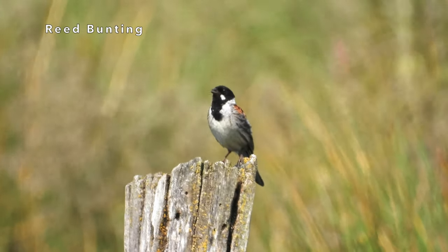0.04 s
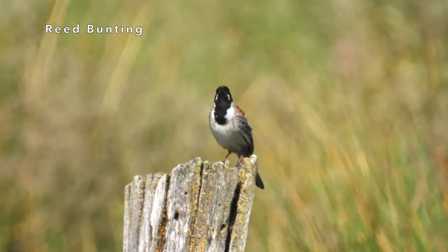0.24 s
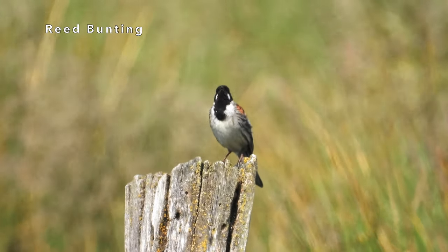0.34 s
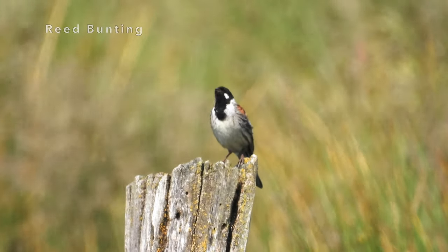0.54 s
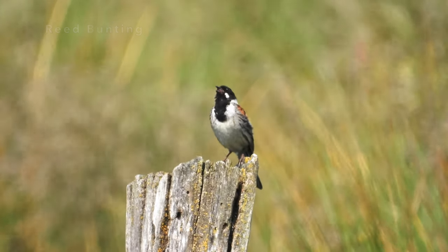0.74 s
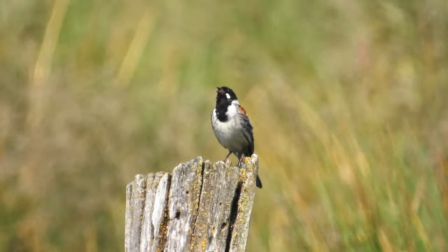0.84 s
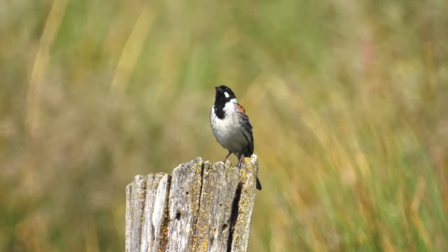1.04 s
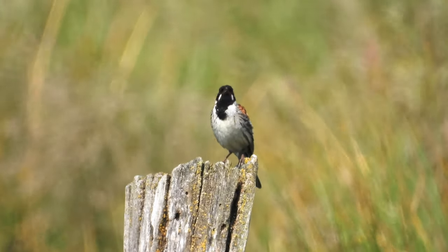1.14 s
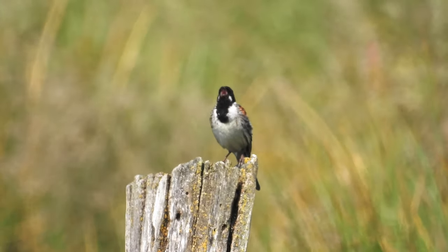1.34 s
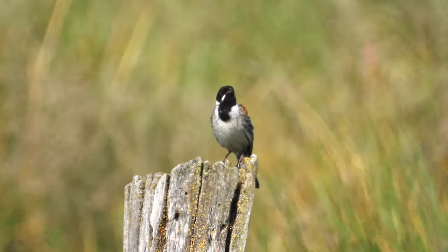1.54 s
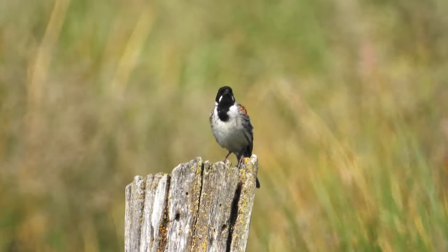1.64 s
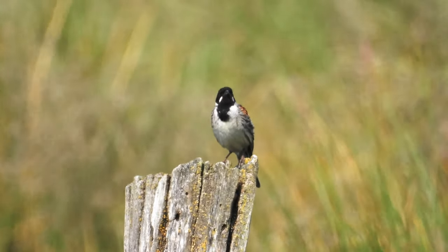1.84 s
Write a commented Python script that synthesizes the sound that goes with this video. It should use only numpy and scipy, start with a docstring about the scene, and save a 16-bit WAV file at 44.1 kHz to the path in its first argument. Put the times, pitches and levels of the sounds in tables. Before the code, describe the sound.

A small bird sings in an open meadow. The tail of an earlier note fades at 0 s while soft low wind bumps thud until 0.4 s. A rapid slurred, gliding phrase comes at 0.36-0.53 s, then stuttering, falling chirps at 0.92 and 1.02 s, and again at 1.46 and 1.56 s. A faint tick at 1.12 s, faint far call near 1.65 s, slight breeze. Right channel; left only hiss.

```python
"""Small bird on a fence post

A small bird sings a slurred opening phrase and two pairs of quick chirps, as gliding sine whistles.
The meadow grass scatters each note, as decaying noise convolved with the song.
Light wind bumps the microphone with low pushes and puffs of noise; ticks, pips and crackle are faint.
One call, perhaps a bird, comes from far off, as a low gliding whistle and its faint octave.
The microphone feeds the right channel; the left carries only faint hiss.
"""
import sys
import numpy as np
from scipy import signal
from scipy.io import wavfile
from scipy.ndimage import uniform_filter1d

SR = 44100
rng = np.random.default_rng(int(sys.argv[2]) if len(sys.argv) > 2 else 0)


def to_wav(sig):
    """Store sig (one row per channel, or 1-D mono) as 16-bit WAV at the path in sys.argv[1].

    Samples outside -1..1 are clipped; the rate is SR.
    """
    pcm = np.clip(np.atleast_2d(sig), -1, 1) * 32767
    pcm = np.round(pcm).astype(np.int16)
    wavfile.write(sys.argv[1], SR, pcm.T)  # frames by channels


N = 83790  # length in samples
TIME = np.arange(N) / SR  # seconds


def amp(db):
    """Decibels to gain."""
    return 10 ** (np.asarray(db) / 20)


def unit(x):
    """Scales to rms 1."""
    return x / np.sqrt(np.mean(x ** 2) + 1e-20)


def smooth(x, seconds):
    """Moving average under a bell that falls to exp(-2) at the given seconds from its centre."""
    lag = np.arange(-200, 201) / SR
    bell = np.exp(-2 * (lag / seconds) ** 2)
    padded = np.pad(x, len(lag) // 2, "edge")
    return np.convolve(padded, bell / bell.sum(), "valid")


def add(mix, start_s, sound):
    """Mixes a sound in at a time, cut off at the end of the scene."""
    part = mix[max(round(start_s * SR), 0):][:len(sound)]
    part += sound[:len(part)]


def swell(rise_s):
    """A short envelope that rises to 1 and dies away."""
    u = TIME / rise_s
    return u * np.exp(1 - u)


def level_curve(points):
    """Gain over the whole scene, drawn in straight dB lines between (s, dB) points."""
    return amp(np.interp(TIME, *np.transpose(points)))


def noise(colour, patchy_db=0):
    """Noise of rms 1, coloured by (Hz, dB) points, with random patches in time and pitch."""
    hz = np.fft.rfftfreq(1024, 1 / SR)
    real, imag, patches = rng.standard_normal((3, N // 256 + 5, len(hz)))
    patches = uniform_filter1d(patches, size=6, axis=0)  # blurred in time
    patches = unit(uniform_filter1d(patches, size=12, axis=1))  # blurred in frequency
    colour_hz, colour_db = np.transpose(colour)
    spectrum_db = np.interp(np.log(hz + 1), np.log(colour_hz), colour_db)
    frames = (real + 1j * imag) * amp(spectrum_db + patchy_db * patches)
    return unit(signal.istft(frames.T, nperseg=1024, noverlap=768)[1][:N])


def scatter(x, db, rise_s, t60_s):
    """A cloud of small reflections that builds up and dies away by 60 dB in t60_s."""
    t = TIME[:SR // 2]
    tail = rng.standard_normal(len(t)) * amp(-60 * t / t60_s) * np.minimum(t / rise_s, 1)
    return amp(db) * signal.fftconvolve(x, tail / np.linalg.norm(tail))[:N]


EDGE_S, GLIDE_S = .0018, .0011  # soft ends of a note; rounding of its contour
JITTER, JITTER_S = .007, .0005  # rms share of the pitch; smoothing of the waver
RASP, RASP_HZ_PER_S, RASP_S = .18, 250000, .0004  # roughness; glide speed scale; smoothing
OVERTONE_DB = -46  # octave, relative to the whistle


def tone(hz, db):
    """A nearly pure, slightly unsteady whistle with soft ends, rougher where it glides fast."""
    t = np.arange(len(hz)) / SR
    wobble, grain = rng.standard_normal((2, N // 8))
    waver = 1 + JITTER * np.resize(unit(smooth(wobble, JITTER_S)), len(hz))
    glide_hz_per_s = abs(np.gradient(hz)) * SR
    roughness = np.resize(unit(smooth(grain, RASP_S)), len(hz))
    rasp = RASP * np.tanh(glide_hz_per_s / RASP_HZ_PER_S) * roughness
    phase = 2 * np.pi * np.cumsum(hz * waver) / SR
    whistle = np.sin(phase) + amp(OVERTONE_DB) * np.sin(2 * phase)
    nearest_end_s = np.minimum(t, t[::-1])
    ends = np.sin(np.pi / 2 * np.minimum(nearest_end_s / EDGE_S, 1)) ** 2
    return ends * amp(db) * (1 + rasp) * whistle


def note(contour, pitch=1):
    """Start time and sound of a whistle that glides along a contour, its pitches multiplied by pitch."""
    s, hz, db = np.transpose(sorted(contour))
    t = np.arange(s[0], s[-1] + EDGE_S / 2, 1 / SR)
    hz_curve = smooth(np.interp(t, s, hz), GLIDE_S)
    db_curve = smooth(np.interp(t, s, db), GLIDE_S)
    return s[0], tone(pitch * hz_curve, db_curve)


# End of an earlier note from the post. Each row: time in seconds, pitch in Hz, level in dB.
EARLIER_NOTE = [(0, 4280, -32), (.003, 4050, -39), (.007, 3600, -52)]


def earlier_note(song):
    """The bird's earlier note, ending in a quick downward glide."""
    add(song, *note(EARLIER_NOTE))


# Colour of that note's echo. Each row: frequency in Hz, relative level in dB.
EARLIER_ECHO_COLOUR = [(2700, -43), (3600, 5), (4200, 5.5), (5500, -54)]


def earlier_echo():
    """The echo of the earlier note: a narrow band of noise that dies by 60 dB in 0.24 s."""
    start_db, t60_s = -52, .24
    return amp(start_db - 60 * TIME / t60_s) * noise(EARLIER_ECHO_COLOUR)


# Colour of the noise under the song. Each row: frequency in Hz, relative level in dB.
SONG_NOISE_COLOUR = [(1500, -18.5), (2500, 2), (3400, -27.5), (4500, 8.5), (7800, -3), (9000, -18.5),
                     (11000, -4.5), (13000, -30), (16000, -29)]


def song_noise(song):
    """Patchy coloured noise that swells and fades with the whistles."""
    loudness = smooth(abs(song), GLIDE_S)
    return amp(-23.5) * loudness * noise(SONG_NOISE_COLOUR, patchy_db=5)


# Colour of the low rumble. Each row: frequency in Hz, relative level in dB.
RUMBLE_COLOUR = [(20, -1), (45, -36), (80, -15.5), (140, 3), (200, 1.5), (320, -2.5), (500, -11.5),
                 (900, -30), (2000, -97), (16000, -80)]
# Level of the low rumble. Each row: time in seconds, level in dB.
RUMBLE_LEVEL = [(0, -56), (.07, -56), (.2, -53), (.38, -52), (.5, -59.5), (.68, -62.5), (.76, -58),
                (.9, -64), (.95, -77.5), (1.01, -65.5), (1.08, -79), (1.19, -66.5), (1.26, -56),
                (1.44, -63.5), (1.56, -55), (1.66, -66.5), (1.79, -64.5), (1.84, -52), (1.9, -56.5)]


def low_rumble():
    """Low coloured noise under a drawn level curve."""
    return noise(RUMBLE_COLOUR, patchy_db=2.5) * level_curve(RUMBLE_LEVEL)


# Breeze in the meadow grass. Each row: frequency in Hz, relative level in dB.
BREEZE_COLOUR = [(200, -10.5), (500, -9.5), (850, -2), (1200, -11.5), (1600, -18), (2300, -15.5),
                 (3300, -21.5), (6000, -20), (16000, -53)]
# Level of the breeze. Each row: time in seconds, level in dB.
BREEZE_LEVEL = [(0, -75), (.6, -76.5), (.95, -70), (1.18, -66), (1.3, -65), (1.5, -63), (1.64, -60.5),
                (1.71, -55), (1.78, -65.5), (1.9, -59.5)]


def breeze():
    """Broad coloured noise of the breeze in the grass, under a drawn level curve."""
    return noise(BREEZE_COLOUR, patchy_db=3.5) * level_curve(BREEZE_LEVEL)


# Steady outdoor air at the microphone. Each row: frequency in Hz, relative level in dB.
AIR_COLOUR = [(100, -22), (700, -1.5), (1400, 2.5), (2200, 5), (3300, -7.5), (5500, -2.5), (6500, -7),
              (7300, 5.5), (7900, 7), (8800, -4.5), (10500, -4.5), (13000, -9), (16000, -5)]


def outdoor_air():
    """Patchy coloured noise at one overall level."""
    return amp(-69) * noise(AIR_COLOUR, patchy_db=3.5)


# Hiss of the empty left channel. Each row: frequency in Hz, relative level in dB.
HISS_COLOUR = [(30, -12), (600, -13.5), (1300, -18), (2000, -4), (2700, -3), (4700, 1), (8000, 0),
               (16000, -0.5)]


def channel_hiss():
    """Faint noise of the channel that no microphone feeds."""
    return amp(-79) * noise(HISS_COLOUR, patchy_db=2.5)


# Dry stalks in the breeze. Each entry: pitch of one kind of snap in Hz.
CRACKLE_HZ = [5280, 7840, 8400]
CRACKLE_PER_S, CRACKLE_RISE_S = 11, .002  # snaps of all pitches together; rise of each
CRACKLE_DB, CRACKLE_SPREAD_DB = -61, .5  # smallest snap; scale of the random extra level


def crackle():
    """Sparse, tiny snaps of dry stalks: brief sine pulses at random times, of slightly uneven size."""
    u = TIME[:SR // 50] / CRACKLE_RISE_S
    envelope = u * np.exp(1 - u)
    chance = CRACKLE_PER_S / len(CRACKLE_HZ) / SR  # per sample and pitch
    out = np.zeros(N)
    for hz in CRACKLE_HZ:
        extra_db = CRACKLE_SPREAD_DB * np.minimum(rng.exponential(1, N), 2)
        snaps = amp(CRACKLE_DB + extra_db) * (rng.random(N) < chance)
        snap = envelope * np.sin(2 * np.pi * hz * TIME[:len(u)])
        out += signal.fftconvolve(snaps, snap)[:N]
    return out


# Faint ticks. Each row: start in seconds, level in dB.
TICKS = [(0.074, -62.5), (0.611, -65.5), (1.123, -50), (1.717, -61.5)]
# Colour of a tick's body and tail. Each row: frequency in Hz, relative level in dB.
TICK_COLOUR = [(300, -12), (1100, -18), (1400, -7), (1900, 1), (2250, 5), (2800, -4), (4500, -17),
               (9000, -24), (16000, -65)]
# Colour of its sharp crack. Each row: frequency in Hz, relative level in dB.
CRACK_COLOUR = [(500, -13), (2200, -3.5), (3000, -18.5), (4300, -5.5), (6000, -14), (16000, -50)]
TICK_RISE_S, TICK_T60_S = .004, .081
TICK_TAIL_DB, TICK_TAIL_T60_S = -9, .21  # tail level relative to the body
CRACK_DELAY_S, CRACK_DB, CRACK_RISE_S = .003, -1, .0012  # each crack's level relative to the tick


def ticks():
    """Dry ticks: a sharp crack in noise over a duller noise that decays first fast, then slower."""
    body = amp(-60 * TIME / TICK_T60_S)
    tail = amp(TICK_TAIL_DB - 60 * TIME / TICK_TAIL_T60_S)
    shape = np.minimum(TIME / TICK_RISE_S, 1) * (body + tail)
    out = np.zeros(N)
    for start_s, db in TICKS:
        add(out, start_s, amp(db) * shape * noise(TICK_COLOUR))
        for _ in range(2):  # two independent noises make up the crack
            crack = swell(CRACK_RISE_S) * noise(CRACK_COLOUR)
            add(out, start_s + CRACK_DELAY_S, amp(db + CRACK_DB) * crack)
    return out


# Wind bumps on the microphone. Each row: start in seconds, level in dB, pitch in Hz, rise in seconds.
BUMPS = [(.088, -38.5, 240, .003), (.112, -43, 190, .004), (.139, -45, 300, .0024),
         (.1585, -33, 290, .0024), (.169, -42, 350, .0028), (.2295, -37, 300, .0026),
         (.263, -48, 300, .004), (.3155, -37.5, 205, .004), (.355, -45, 155, .007),
         (.860, -45.5, 270, .0026), (1.696, -51, 150, .004)]
# Colour of a bump's puff. Each row: frequency as share of twice the bump's pitch, relative level in dB.
PUFF_COLOUR = [(.1, -27), (.4, 3), (1, 2.5), (1.5, -17), (2.6, -60)]
PUFF_DB = -9  # rms, relative to a push of amplitude 1


def wind_bumps():
    """Short low pushes at the microphone: a swelling sine with a puff of noise."""
    out = np.zeros(N)
    for start_s, db, hz, rise_s in BUMPS:
        puff = noise([(share * 2 * hz, level) for share, level in PUFF_COLOUR])
        push = np.sin(2 * np.pi * hz * TIME) + amp(PUFF_DB) * puff
        add(out, start_s, amp(db) * swell(rise_s) * push)
    return out


# Opening phrase from the post, a list of contours.
# Each row of a contour: time in seconds, pitch in Hz, level in dB.
PHRASE = [
    [(.361, 4800, -58), (.368, 5450, -42), (.373, 6150, -41), (.377, 6800, -48)],
    [(.3755, 4400, -41), (.380, 5330, -32), (.387, 5780, -33), (.3925, 6850, -40), (.398, 6200, -50)],
    [(.3915, 4250, -44), (.399, 5300, -30), (.409, 5610, -30), (.421, 5510, -28.5), (.433, 5260, -26.5),
     (.450, 4620, -32), (.457, 3950, -43)],
    [(.424, 4750, -52), (.436, 4450, -45), (.445, 4150, -42), (.449, 3900, -50)],
    [(.455, 7400, -50), (.4585, 7000, -42), (.463, 5350, -29.5), (.466, 4450, -33), (.469, 3800, -42),
     (.473, 4100, -42), (.479, 3200, -51)],
    [(.470, 4300, -48), (.474, 5500, -42), (.478, 4000, -44)],
    [(.480, 3100, -55), (.487, 3450, -40), (.5005, 3680, -39.5), (.5055, 2850, -46)],
]


def opening_phrase(song):
    """Slurred gliding notes, and a faint lower echo of the long one."""
    for contour in PHRASE:
        add(song, *note(contour))


# Tiny high pips from the meadow. Each row: start in seconds, opening level in dB.
PIPS = [(.449, -53), (0.77, -52.5), (1.545, -48.5), (1.621, -53), (1.668, -52)]
PIP_HZ, PIP_S, PIP_FALL_DB = 7970, .0043, -10


def pips():
    """Tiny high pips from the meadow: brief level whistles that fade, with scattered reflections."""
    out = np.zeros(N)
    for start_s, db in PIPS:
        add(out, start_s, note([(0, PIP_HZ, db), (PIP_S, PIP_HZ, db + PIP_FALL_DB)])[1])
    return out + scatter(out, db=-17, rise_s=.0065, t60_s=.2)


VIBRATO_PER_S, VIBRATO_HZ = 148, 520  # rate; depth each way
QUAVER_SAG_HZ, QUAVER_FADE_DB, QUAVER_THROB_DB = 520, -16, 3  # over its length; throb each way


def quaver(length_s, hz, db):
    """A fading, sinking whistle with a fast, deep vibrato, loudest at each crest."""
    t = np.arange(0, length_s, 1 / SR)
    swing = -np.cos(2 * np.pi * VIBRATO_PER_S * t)
    age = t / length_s
    pitch_hz = hz + VIBRATO_HZ * swing - QUAVER_SAG_HZ * age
    return tone(pitch_hz, db + QUAVER_THROB_DB * swing + QUAVER_FADE_DB * age)


# Beak click before the first chirp. Each row: time in seconds, pitch in Hz, level in dB.
BEAK_CLICK = [(.9192, 6000, -44), (.9205, 5300, -39), (.922, 4500, -46)]


def beak_click(song):
    """A click of the beak, made as a very short falling whistle."""
    add(song, *note(BEAK_CLICK))


# Chirps from the post. Each row: stutter start in seconds, stutter level in dB,
# whistle start in seconds, whistle level in dB, pitch in Hz.
CHIRPS = [(.9240, -37, .9450, -30.3, 5230), (1.0220, -33.5, 1.0427, -30.8, 5250),
          (1.4634, -35, 1.4850, -30.8, 5190), (1.5615, -32.5, 1.5810, -29.8, 5230)]
# The stutter's three flicks, one contour each. Each row of a contour: seconds after the stutter's start,
# pitch in Hz, level in dB relative to the stutter's.
STUTTER = [
    [(-.0005, 3600, -11), (.0028, 4550, 0), (.0062, 5950, -6)],
    [(.005, 3600, -7), (.0095, 5150, 1.5), (.014, 5750, -6)],
    [(.0115, 4200, -3), (.0155, 5000, 1), (.0205, 4700, -7)],
]
# The falling whistle with one catch. Each row: seconds after its start, pitch as share of the chirp's,
# level in dB relative to the whistle's.
WHISTLE = [(0, 1.37, -19), (.005, 1.13, -10), (.010, 1.07, -3.5), (.017, 1.015, -.3), (.0235, .985, -.8),
           (.0268, 1.14, -13), (.029, 1.04, -3), (.033, .86, -1.5), (.044, .765, -5), (.056, .685, -20)]


def chirps(song):
    """Four chirps: quick flicks that rise at first, then a falling whistle with one catch."""
    for stutter_s, stutter_db, whistle_s, whistle_db, hz in CHIRPS:
        for flick in STUTTER:
            offset_s, sound = note(flick)
            add(song, stutter_s + offset_s, amp(stutter_db) * sound)
        add(song, whistle_s, amp(whistle_db) * note(WHISTLE, hz)[1])


# A call from far off: contours of its low whistle and of the faint octave.
# Each row of a contour: time in seconds, pitch in Hz, level in dB.
FAR_CALL = [
    [(1.645, 1090, -66), (1.666, 1130, -51), (1.684, 1080, -50), (1.698, 990, -57)],
    [(1.682, 2113, -65), (1.693, 2290, -51), (1.702, 2360, -75)],
]


def far_call():
    """A far call, perhaps a bird: a low gliding whistle and its faint octave, blurred by distance."""
    call = np.zeros(N)
    for contour in FAR_CALL:
        add(call, *note(contour))
    return call + scatter(call, db=-5, rise_s=.0036, t60_s=.3)


def bird():
    """The song from the post, with its patchy noise and reflections scattered by the grass."""
    song = np.zeros(N)
    earlier_note(song)
    echo = earlier_echo()
    opening_phrase(song)
    beak_click(song)
    add(song, .5040, quaver(length_s=.026, hz=3400, db=-42))  # the phrase dies away in it
    chirps(song)
    song += song_noise(song)
    near_grass = scatter(song, db=-15, rise_s=.002, t60_s=.075)
    far_grass = scatter(song, db=-14.5, rise_s=.0069, t60_s=.21)
    return song + echo + near_grass + far_grass


def scene():
    """The meadow on the right; only hiss on the left."""
    voices = bird() + far_call() + pips()
    wind = low_rumble() + breeze() + wind_bumps()
    meadow = voices + wind + ticks() + outdoor_air()
    left = channel_hiss()
    return np.array([left, meadow + crackle()])


def record(dry):
    """The microphone's low cut and the recorder's band limit."""
    low_cut = signal.butter(2, 119, "high", fs=SR, output="sos")  # Hz
    thin = signal.sosfilt(low_cut, dry)
    band_limit = signal.firwin(511, 15700, window=("kaiser", 9), fs=SR)  # Hz
    return signal.oaconvolve(thin, band_limit[None], "same")


dry = scene()
out = record(dry)
to_wav(out)
```